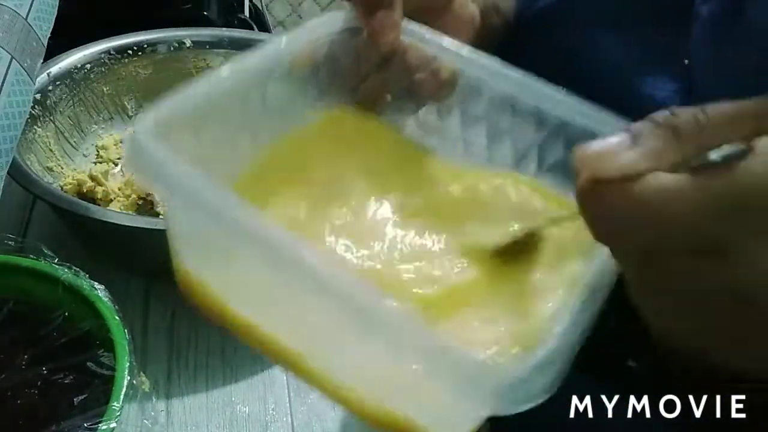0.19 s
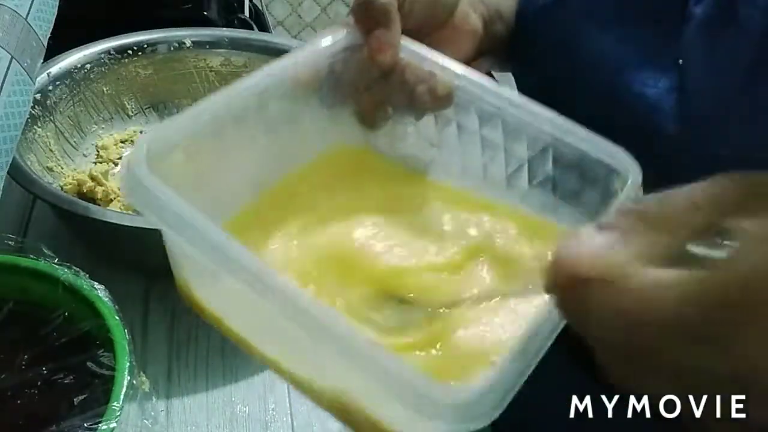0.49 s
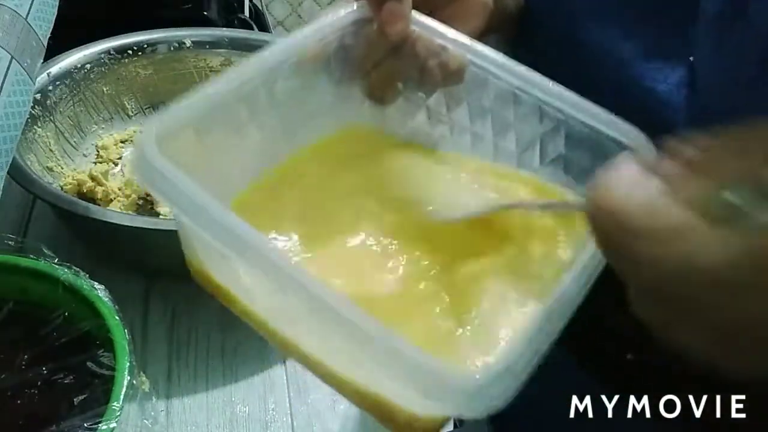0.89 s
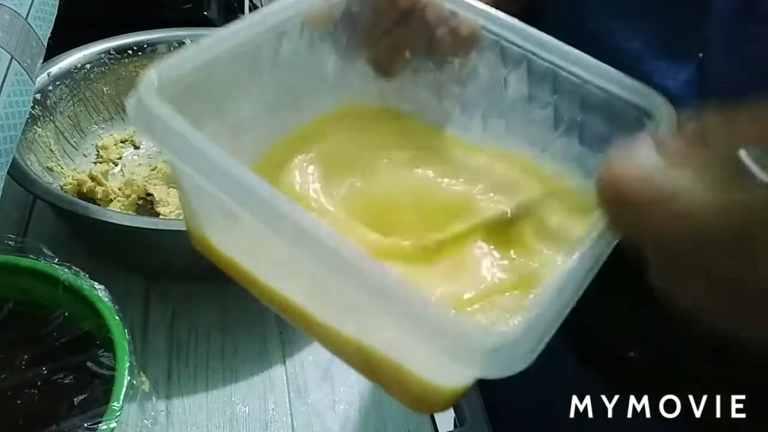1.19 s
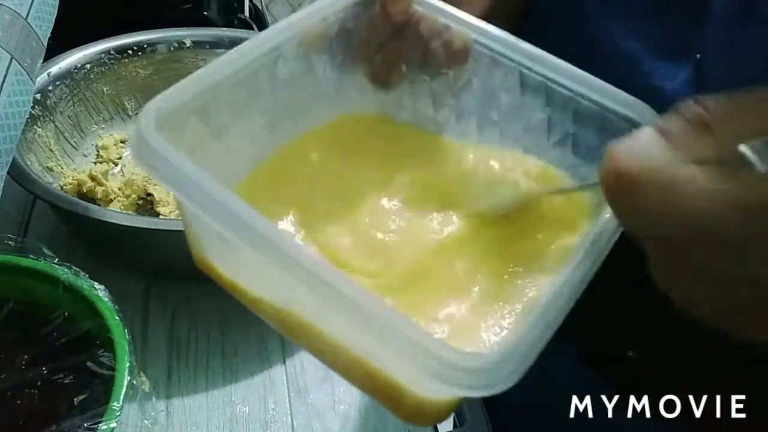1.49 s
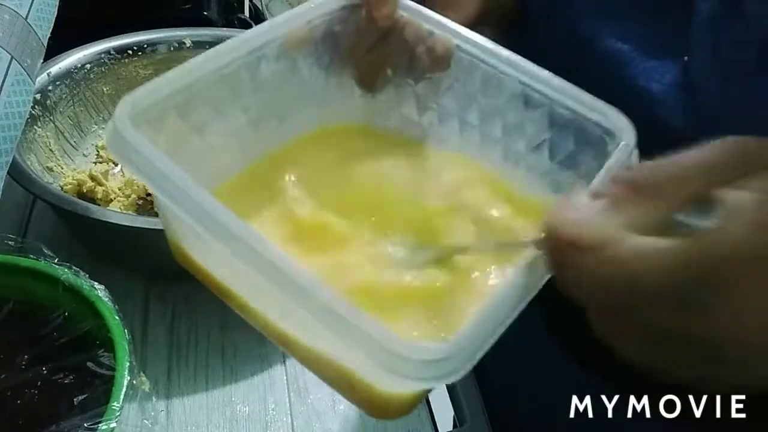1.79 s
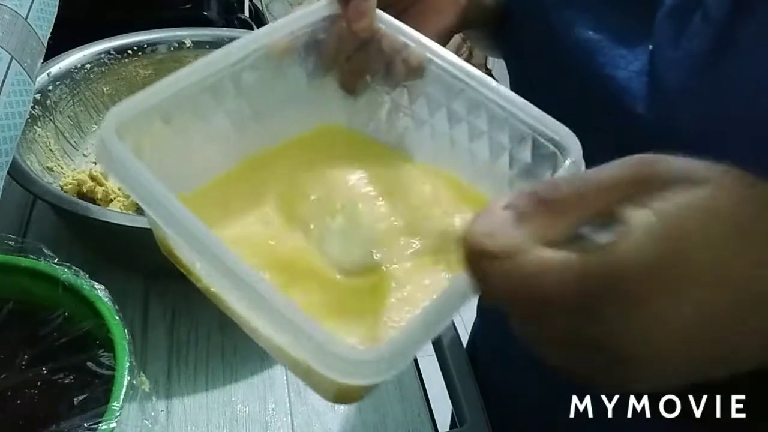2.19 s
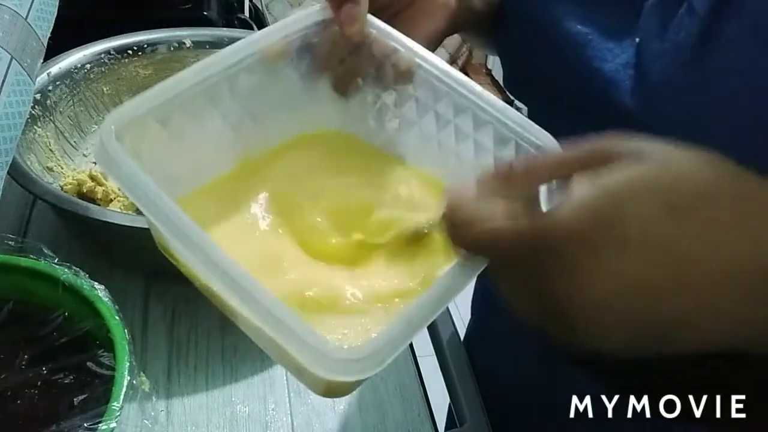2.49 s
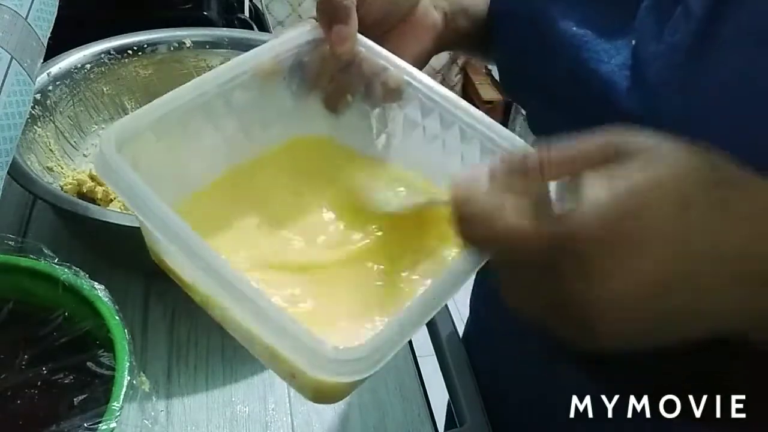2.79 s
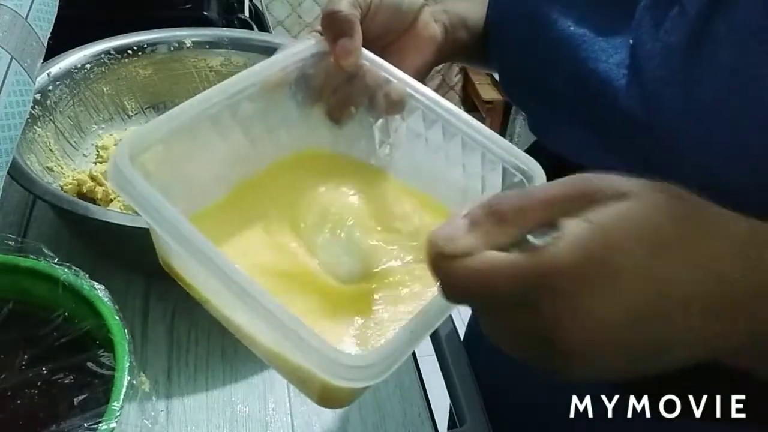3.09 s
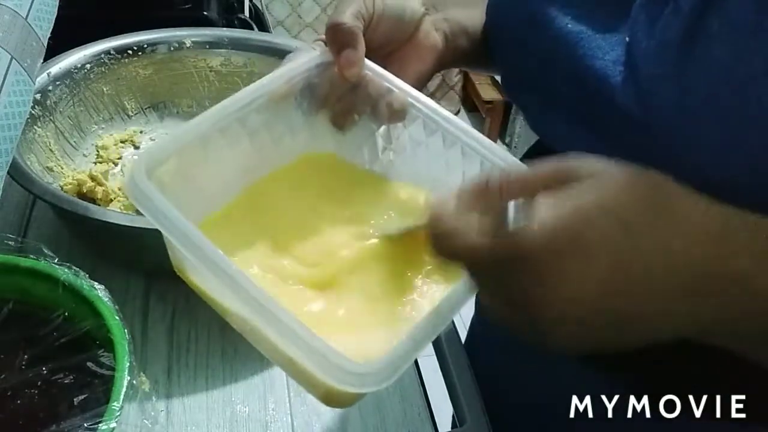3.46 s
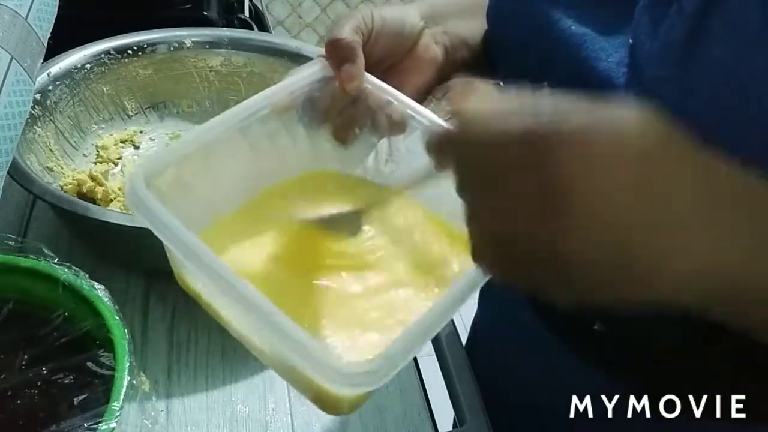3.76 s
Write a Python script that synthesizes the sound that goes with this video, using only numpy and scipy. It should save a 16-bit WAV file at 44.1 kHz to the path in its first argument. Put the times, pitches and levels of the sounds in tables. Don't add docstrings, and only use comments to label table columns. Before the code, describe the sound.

A fork beats eggs in a hand-held plastic tub, close up in a small quiet kitchen. From 0.2 s, hollow mid-pitched knocks come about every 0.22 s, the second weaker, strongest around 0.6-1.7 s, then slightly softer. Before each, tines plunge and egg slaps the wall with slosh, fizz and bubble pops. A soft last knock at 3.7 s, then faint room air with two tiny dropouts after 3.85 s.

```python
import sys
import numpy as np
from scipy import signal
from scipy.fft import rfft, irfft
from scipy.io import wavfile
from scipy.ndimage import uniform_filter1d

SR = 44100
rng = np.random.default_rng(int(sys.argv[2]) if len(sys.argv) > 2 else 0)


def transcribe(signal):
    frames = np.atleast_2d(signal).T
    limited = np.clip(frames, -1, 1)
    pcm = np.round(limited * 32767).astype(np.int16)
    wavfile.write(sys.argv[1], SR, pcm)


def nominal_scale(level):
    x = np.asarray(level, float) / 20
    return 10 ** x


N = 174195

# (time [s], peak level [dB], hollow pitch [Hz], crack of the tines [dB], spray [dB])
KNOCKS = [(0.216, -15.5, 576, -40.5, -52), (0.444, -20.5, 518, -49.5, -62), (0.636, -11, 525.4, -39, -51),
          (0.848, -11.5, 532, -36.5, -54.5), (1.063, -9.5, 526, -37, -52),
          (1.271, -11.5, 525, -36.5, -50.5), (1.481, -10.5, 527, -36.5, -50.5),
          (1.701, -11.5, 520, -37, -49.5), (1.917, -13.5, 521, -52.5, -54), (2.124, -12.5, 528, -35.5, -49),
          (2.342, -14, 528, -47, -50.5), (2.566, -15, 530, -38.5, -51), (2.79, -14, 543, -40, -52),
          (2.995, -13.5, 556, -39, -52), (3.223, -14, 531, -56.5, -56.5), (3.443, -15, 539, -39, -49.5),
          (3.688, -22.5, 534, -62, -63)]
# (time [s], peak level [dB], pitch [Hz])
CLACKS = [
    (0.848, -28, 780),
    (1.063, -24.5, 854),
    (1.701, -32, 1176),
    (2.124, -30.5, 1187),
    (2.343, -29, 1174),
    (2.566, -32.5, 1177),
    (2.79, -33.5, 1316),
    (3.441, -28.5, 962),
]
# (pitch [Hz], level [dB], time to fall 60 dB [s])
TUB_MODES = [(208, -13.5, 0.11), (342, -22.5, 0.31), (449, -6, 0.1), (414.4, -9.5, 0.12),
             (583.5, -17.5, 0.21), (544.7, -12, 0.13), (932, -27, 0.053), (936, -27, 0.13),
             (1176, -12.5, 0.028), (1400, -10, 0.019), (1561, -12.5, 0.04), (1970, -16.5, 0.032)]
# (pitch [Hz], level [dB], time to fall 60 dB [s])
RIM_MODES = [(209, -33, 0.21), (302.43, -27, 0.083), (333, -28, 0.11), (858, -20.5, 0.034),
             (925, -34, 0.19)]
# (frequency [Hz], level [dB per Hz])
CRACK_COLOUR = [(880, -1.5), (1500, 2), (3150, -12), (3480, -5), (4460, -16.5), (6890, -15), (9010, -26),
                (10500, -27), (16000, -53)]
# (frequency [Hz], level [dB per Hz])
SPRAY_COLOUR = [(880, -27.5), (1500, 1.5), (2210, -24), (2800, -13), (4590, -18), (7240, -20), (8570, -34),
                (10600, -36), (16000, -50)]
# (frequency [Hz], level [dB per Hz])
WAKE_COLOUR = [(88, -52), (150, -29), (339, -7), (441, -1.5), (775, -18), (912, -18.5), (3000, -36.5),
               (3900, -78), (6600, -120)]
# (time [s], level [dB], time to fall 60 dB [s])
EARLIER_CHURN = [(0.0, -60.5, 0.6)]
# (time [s], peak level [dB], pocket pitch [Hz], wall thump [dB])
SLAPS = [(0.139, -37.5, 1685, -33.5), (0.175, -36, 1640, -49), (0.367, -28, 1760, -21),
         (0.575, -29, 1015, -22), (0.768, -29.5, 990, -28), (0.788, -33.5, 1020, -18.5),
         (1.014, -29.5, 1230, -29.5), (1.213, -28, 1590, -26.5), (1.426, -30, 1650, -21.5),
         (1.611, -32, 850, -42), (1.644, -31.5, 1509, -23), (1.663, -51, 1456, -34),
         (1.856, -30.5, 1390, -31.5), (2.07, -32.5, 1460, -26.5), (2.09, -43, 1845, -33),
         (2.285, -30, 1540, -23.5), (2.509, -32.5, 1860, -27.5), (2.529, -43, 1700, -29),
         (2.731, -33, 1631, -30.5), (2.948, -33, 1400, -42), (3.166, -32, 1510, -28.5),
         (3.384, -32, 1530, -28), (3.415, -47.5, 1726, -31), (3.604, -34, 1430, -29.5)]
# (time [s], peak level [dB], pocket pitch [Hz], fizz [dB])
PLUNGES = [(0.0, -47.5, 1610, -67.5), (0.104, -47, 1030, -78.5), (0.345, -40.5, 1530, -61.5),
           (0.549, -45, 1048, -63.5), (0.985, -37.5, 1525, -58), (1.187, -42, 1060, -60.5),
           (1.375, -46, 920, -84), (1.398, -32.5, 827, -64), (1.824, -35, 1554, -59),
           (1.885, -51, 1108, -88), (2.033, -39, 1150, -60.5), (2.254, -44.5, 990.2, -63),
           (2.473, -38, 810, -62.5), (2.693, -32, 1060, -61), (2.911, -31, 900, -61),
           (3.135, -39.5, 1440, -62), (3.351, -40.5, 890, -61.5), (3.573, -52, 1500, -67)]
# (frequency [Hz], level [dB per Hz])
SLOSH_COLOUR = [(410, -34), (700, -3), (1840, 0.5), (2220, -12.5), (2460, -3), (2960, -20.5), (4800, -30.5),
                (7200, -29.5), (16000, -48)]
# (frequency [Hz], level [dB per Hz])
FIZZ_COLOUR = [(1470, -36), (2500, 6), (3230, -16), (6450, -10.5), (7190, -6), (10600, -14.5), (16000, -34)]
# (time [s], peak level [dB], pitch [Hz])
POPS = [(0.105, -66, 2600), (0.137, -47, 2330), (0.137, -47.5, 2110), (0.142, -49, 1507),
        (0.174, -47.5, 1980), (0.2, -48, 1690), (0.344, -53, 2650), (0.365, -44, 1440),
        (0.399, -48.5, 2550), (0.404, -42, 1750), (0.573, -41.5, 1850), (0.574, -32.5, 1069),
        (0.742, -57, 2649), (0.767, -26, 976), (0.768, -37, 1400), (0.787, -41, 1646), (0.799, -37, 883),
        (0.807, -51, 910), (0.961, -59, 2610), (0.99, -48.5, 2090), (0.995, -46.5, 1520),
        (1.026, -44, 1650), (1.027, -42.5, 1890), (1.216, -39, 1535), (1.218, -40, 1010),
        (1.217, -39, 1910), (1.26, -49, 1680), (1.399, -42, 987), (1.423, -41, 2430), (1.422, -42, 1040),
        (1.425, -41.5, 2067), (1.61, -36.5, 861), (1.619, -34, 797), (1.64, -46, 1895), (1.643, -42, 1529),
        (1.661, -38, 1440), (1.66, -45, 1800), (1.831, -53, 861), (2.068, -41.5, 1100), (2.07, -37.5, 1470),
        (2.095, -40, 1885), (2.285, -39, 1456), (2.506, -43.5, 910), (2.527, -41, 1700), (2.694, -45, 1590),
        (2.701, -45, 704), (2.73, -46, 2380), (2.946, -49.5, 2400), (2.948, -44, 2060), (3.084, -59, 1830),
        (3.164, -50, 2300), (3.166, -36.5, 1536), (3.167, -42, 1990), (3.381, -42, 1320),
        (3.381, -50, 2680), (3.381, -47, 1560), (3.383, -49, 2360), (3.412, -46, 1710), (3.603, -46, 2110),
        (3.603, -35.5, 1523)]
# (time [s], peak level [dB])
SPITS = [(0.346, -59), (0.553, -56), (0.7664, -48), (0.9841, -65), (1.1877, -48), (1.2161, -60),
         (1.6382, -67.5), (1.8261, -56), (2.0443, -62.5), (2.693, -49.5), (2.7784, -54.5), (3.3598, -59),
         (3.5743, -75)]
# (frequency [Hz], level [dB per Hz])
SPIT_COLOUR = [(5000, -32), (7500, 2), (10500, -4), (13000, -11.5), (16000, -16)]
# (frequency [Hz], time to fall 60 dB [s])
ROOM_T60 = [(150, 0.52), (500, 0.68), (1500, 0.08), (4000, 0.17), (10000, 0.4)]
# (frequency [Hz], level [dB])
ROOM_GAIN = [(150, -26), (500, -17), (1500, -15.5), (4000, -16.5), (10000, -5.5)]
# (frequency [Hz], level [dB per Hz])
AIR_COLOUR = [(12, -34.5), (20, -8.5), (148, -15.5), (171, -23), (565, -33), (717, -40.5), (1730, -37),
              (2860, -51.5), (6000, -73.5), (13200, -120)]
# (pitch [Hz], level [dB rms])
WHINE = [(1730, -80.5)]
# (frequency [Hz], level [dB])
MIC = [(5500, 0), (7300, 2.5), (8700, -9), (10400, 1.5), (12500, -3.5)]
# (from [s], to [s])
MUTES = [
    (3.8555, 3.862),
    (3.922, 3.9355),
]


def rms_one(x):
    return x / np.sqrt(np.mean(x ** 2) + 1e-20)


def at_hz(points, hz):
    table_hz, value = np.array(points)[:, 0], np.array(points)[:, 1]
    return np.interp(np.log(hz + 1), np.log(table_hz), value)


def colour(x, spectrum):
    hz = np.fft.rfftfreq(N, 1 / SR)
    return rms_one(irfft(rfft(x) * nominal_scale(at_hz(spectrum, hz)), N))


def hiss(spectrum):
    return colour(rng.standard_normal(N), spectrum)


def grains(per_s, spread_db):
    happens = rng.random(N) < per_s / SR
    size = nominal_scale(spread_db * np.minimum(rng.exponential(1, N), 4))
    return happens * size * rng.choice([-1, 1], N)


def clicks(s, gain):
    out = np.zeros(N)
    np.add.at(out, np.maximum(np.asarray(s) * SR, 0).astype(int), gain)
    return out + 1e-18


def ring(x, hz, t60):
    r, w = nominal_scale(-60 / (t60 * SR)), 2 * np.pi * hz / SR
    return signal.lfilter([0, np.sin(w)], [1, -2 * r * np.cos(w), r * r], x)


def dying(s, db, t60):
    return signal.lfilter([1], [1, -nominal_scale(-60 / (t60 * SR))], clicks(s, nominal_scale(db)))


def soft(x, hz):
    r = np.exp(-2 * np.pi * hz / SR)
    return signal.lfilter([(1 - r) ** 2], [1, -2 * r, r * r], x)


def swell(s, db, hz, t60):
    out, t = np.zeros(N + 6000), np.arange(6000) / SR
    k = t * np.log(1000) / t60
    for start, level, f in zip(s, db, hz):
        out[int(start * SR):][:len(t)] -= nominal_scale(level) * k * np.exp(1 - k) * np.sin(2 * np.pi * f * t)
    return out[:N]


def patchy(x):
    hz, spectrum, out = np.fft.rfftfreq(N, 1 / SR), rfft(x), x
    for low in 3000 * 2 ** np.arange(0, 2.4, 1 / 3):
        flicker_db = 2.5 * rms_one(soft(rng.standard_normal(N), hz=30))
        inside = (hz >= low) & (hz < low * 2 ** (1 / 3))
        out = out + irfft(spectrum * inside, N) * (nominal_scale(flicker_db) - 1)
    return out


CONTACT_HZ = 1400


def knocks():
    s, db, hz, crack_db, spray_db = np.transpose(KNOCKS)
    bong = swell(s + 0.00058, db - 2.5, hz, t60=0.017)
    bong = signal.lfilter(*signal.butter(2, 227, "high", fs=SR), bong)
    crack = soft(dying(s, crack_db + 9.5, t60=0.018), hz=520) * hiss(CRACK_COLOUR)
    clack_s, clack_db, clack_hz = np.transpose(CLACKS)
    clack = swell(clack_s, clack_db - 6, clack_hz, t60=0.022)
    spray = dying(s, spray_db, t60=0.27) * hiss(SPRAY_COLOUR)
    churn = dying(s, db - 20.5, t60=0.23)
    churn = churn + sum(dying([t], [level], t60) for t, level, t60 in EARLIER_CHURN)
    wake = soft(churn, hz=46.55) * hiss(WAKE_COLOUR)
    return bong + tub(s, db - 8) + rim() + crack + clack + patchy(spray) + wake


def tub(s, db):
    scatter_db = rng.normal(0, 2.2, (len(s), len(TUB_MODES)))
    out = np.zeros(N)
    for k, (hz, level, t60) in enumerate(TUB_MODES):
        blows = clicks(s, -nominal_scale(db + level + scatter_db[:, k]))
        out += ring(soft(blows, CONTACT_HZ), hz, t60)
    return out


def rim():
    return sum(ring(soft(clicks([0.2155], -nominal_scale(level)), CONTACT_HZ), hz, t60)
               for hz, level, t60 in RIM_MODES)


def slosh_grains():
    return colour(grains(per_s=2500, spread_db=4), SLOSH_COLOUR)


def fizz_grains():
    return colour(grains(per_s=5000, spread_db=4), FIZZ_COLOUR)


def slaps():
    s, db, hz, thump_db = np.transpose(SLAPS)
    thump = swell(s, thump_db - 9.5, np.full_like(s, 169.8), t60=0.05)
    wall = swell(s, (db + thump_db) / 2 - 7.5, np.full_like(s, 437), t60=0.018)
    slosh = soft(dying(s, db - 14.5, t60=0.22), hz=220) * slosh_grains()
    fizz_db = np.minimum(db, thump_db + 8.5) - 29
    fizz = dying(s, fizz_db, t60=0.15) * fizz_grains()
    return thump + wall + pockets(s, db + 0.5, hz) + slosh + fizz + bubbles(s, db)


def pockets(s, db, hz):
    out, t = np.zeros(N + 2000), np.arange(2000) / SR
    for start, level, f in zip(s, db, hz):
        life = t * f / 28.4
        tone = np.sin(2 * np.pi * f * t * (1 + 0.022 * life))
        out[int(start * SR):][:len(t)] += nominal_scale(level - 60 * life) * (1 - np.exp(-t * f)) * tone
    return out[:N]


def bubbles(s, db):
    pops = grains(per_s=450, spread_db=4.5) * dying(s, db - 12.5, t60=0.52)
    dealt = rng.integers(0, 12, N)
    out = np.zeros(N)
    for k, hz in enumerate(np.geomspace(750, 2300, 12)):
        push = pops * (dealt == k) * hz / SR + 1e-18
        out += ring(ring(push, hz, 18.0 / hz), hz, 4.7 / hz)
    return out


def plunges():
    s, db, hz, fizz_db = np.transpose(PLUNGES)
    fizz = dying(s, fizz_db, t60=0.15) * fizz_grains()
    slosh = soft(dying(s, db - 14.5, t60=0.13), hz=120) * slosh_grains()
    return pockets(s, db - 5, hz) + fizz + slosh


def froth():
    s, db, hz = np.transpose(POPS)
    spit_s, spit_db = np.transpose(SPITS)
    spits = dying(spit_s, spit_db - 6, t60=0.06) * hiss(SPIT_COLOUR)
    return swell(s, db, hz, t60=0.021) + spits


def kitchen(x):
    t, tail = np.arange(SR // 2) / SR, 0
    late = np.maximum(t - 0.008, 0)
    for low in 75 * 2. ** np.arange(8):
        octave = signal.butter(2, [low, 2 * low], "band", fs=SR, output="sos")
        band = signal.sosfilt(octave, rng.standard_normal(len(t)))
        build_up = np.minimum(late / 0.007357, 1)
        fade = nominal_scale(-60 * late / at_hz(ROOM_T60, 0.88 * low)) * build_up
        tail = tail + band * fade / np.sqrt(np.sum(fade ** 2)) * nominal_scale(at_hz(ROOM_GAIN, 1.5 * low))
    return signal.fftconvolve(x, tail)[:N]


def whine():
    return sum(nominal_scale(db) * rms_one(ring(rng.standard_normal(N), hz, 0.25)) for hz, db in WHINE)


def room_air():
    return nominal_scale(-58) * hiss(AIR_COLOUR)


def scene():
    near = knocks() + patchy(slaps() + plunges() + froth())
    near = signal.sosfilt(signal.butter(4, 207.3, "high", fs=SR, output="sos"), near)
    return (near + kitchen(near) + room_air() + whine())[None]


def gate_treble(x):
    open_db, hold_db = -72, 3.5
    high = signal.sosfiltfilt(signal.butter(6, 3020, "high", fs=SR, output="sos"), x)
    level_db = 10 * np.log10(uniform_filter1d(high ** 2, size=700, origin=250) + 1e-14)
    at = np.arange(N)
    opened = np.maximum.accumulate(np.where(level_db > open_db, at, -1), axis=1)
    shut = np.maximum.accumulate(np.where(level_db < open_db - hold_db, at, -1), axis=1)
    gain = uniform_filter1d(np.where(opened >= shut, 1, nominal_scale(-15)), size=150)
    return x - high * (1 - gain)


def squelch(x):
    at = np.arange(N)
    silent = sum((at > start * SR) & (at < end * SR) for start, end in MUTES)
    return x * uniform_filter1d(1. - silent, size=60)


def top_cut(x):
    return signal.sosfilt(signal.butter(12, 16290, fs=SR, output="sos"), x)


def record(dry):
    hz = np.fft.rfftfreq(N, 1 / SR)
    x = irfft(rfft(dry) * nominal_scale(at_hz(MIC, hz)), N)
    x = gate_treble(x)
    x = signal.sosfilt(signal.cheby2(12, 70, 17200, fs=SR, output="sos"), x)
    return top_cut(squelch(x))


dry = scene()
out = record(dry)
transcribe(out)
```